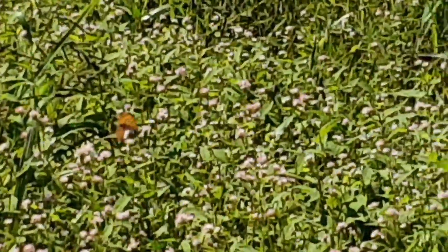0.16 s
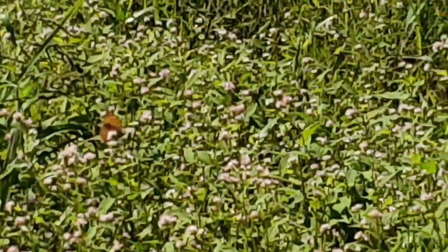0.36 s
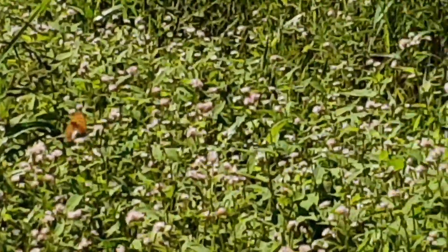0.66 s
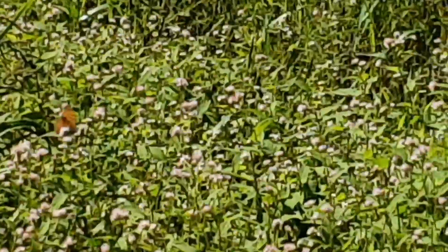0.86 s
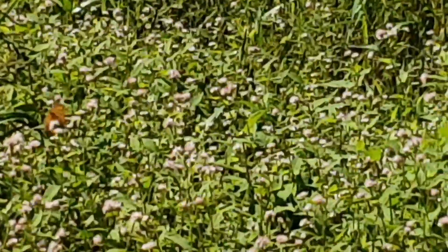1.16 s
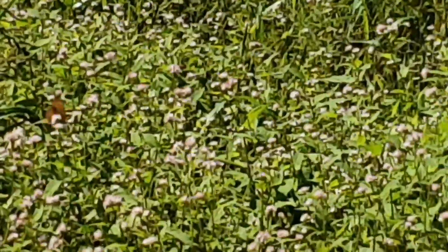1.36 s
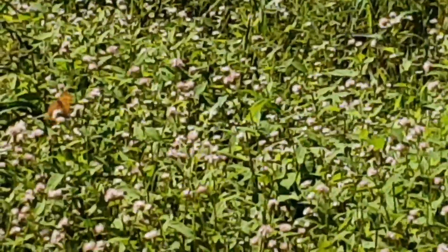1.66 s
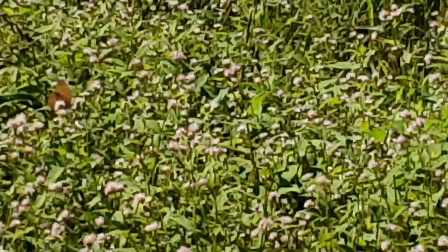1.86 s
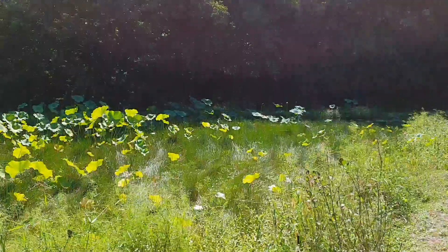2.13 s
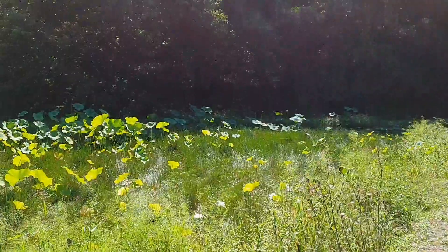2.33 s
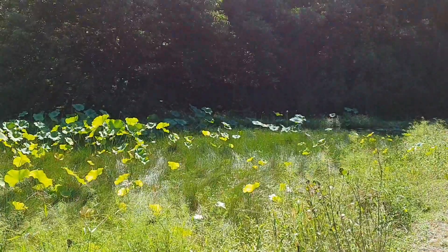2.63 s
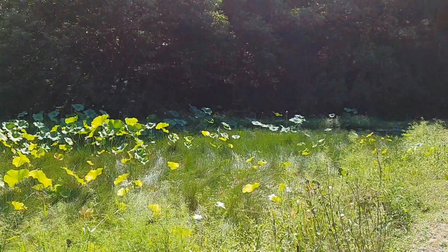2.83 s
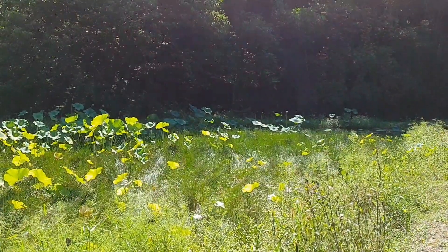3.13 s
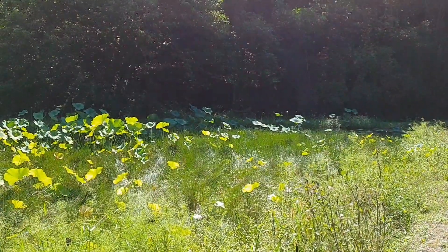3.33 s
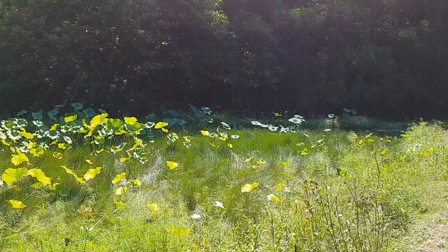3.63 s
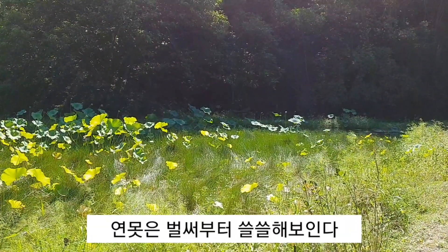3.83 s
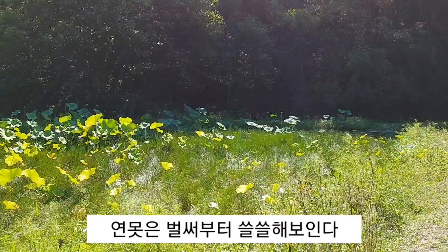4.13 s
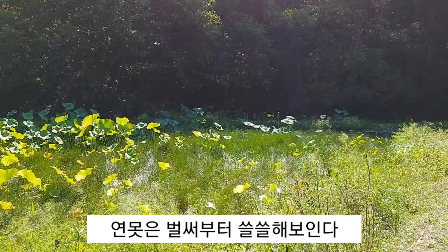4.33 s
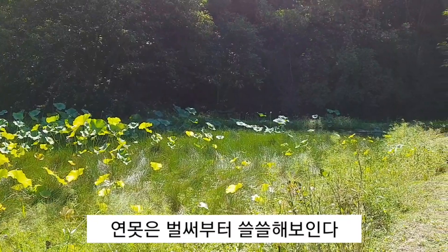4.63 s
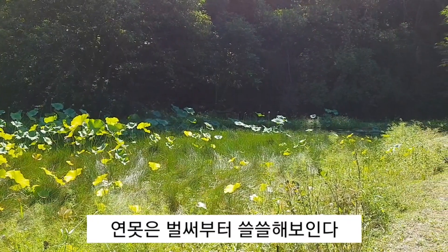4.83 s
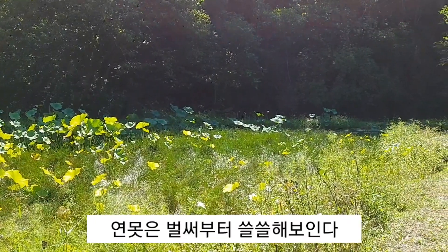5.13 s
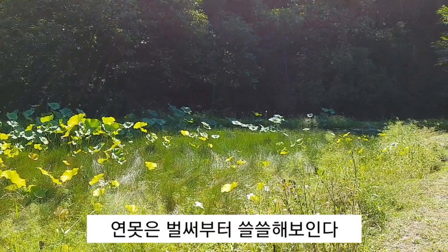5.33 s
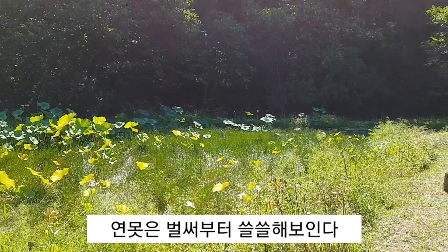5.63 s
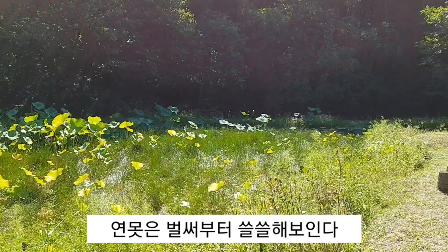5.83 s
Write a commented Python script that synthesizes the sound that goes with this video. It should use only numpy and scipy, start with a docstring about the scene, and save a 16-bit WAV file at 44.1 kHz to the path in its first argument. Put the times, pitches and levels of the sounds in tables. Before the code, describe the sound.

A nearby cicada, slightly left, gives bright buzzes and buzzy calls, then descends into rough short notes over the faint hiss of distant cicadas. A sudden change replaces it with a continuous, shimmering drone of many cicadas, leaning left. Very high, scraping katydid chirps keep going across both places, stronger in the second. Open-air stereo sound, with gentle wind rumble on the microphone and no people.

```python
"""Insects in a sunny meadow

A cicada alternates high buzzes (clicking ribs) with full calls (a ringing belly), then runs down in rough notes.
Katydids chirp throughout by striking the teeth of a ringing wing; a hiss of far-off cicadas surrounds them.
Then the meadow gives way to a pond: the hiss stops and many pulsing cicadas drone from the woods.
Shaped noise makes a light wind rumble on the microphone and the soft hiss of the landscape."""
import sys
import numpy as np
from scipy import signal
from scipy.fft import rfft, irfft
from scipy.io import wavfile

SR = 44100
rng = np.random.default_rng(int(sys.argv[2]) if len(sys.argv) > 2 else 0)


def waveform_to_disk(signal):
    """Save audio, clipped to [-1, 1], as 16-bit WAV at the path in sys.argv[1]."""
    frames = np.transpose(np.atleast_2d(signal))
    scaled = np.clip(frames, -1, 1) * 32767
    samples = np.round(scaled).astype(np.int16)
    wavfile.write(sys.argv[1], SR, samples)


N = 263718
T = np.arange(N) / SR  # time of every sample, in seconds
HZ = np.fft.rfftfreq(N, 1 / SR)  # frequencies of the spectrum
POND_S = 2.768  # the meadow gives way to the pond

# ribs that buckle in one cycle of the two tymbals, the cicada's drum skins: (share of the cycle, level [dB])
TYMBAL_RIBS = [(0, 0), (.26, -5), (.48, -1), (.73, -5)]
# high buzzes between the calls:
# (full from [s], until [s], relative level [dB], tymbal cycles at first [Hz], slowing [Hz per s])
BURSTS = [(0, .27, -40.5, 168, -1), (.56, .915, -41.5, 168.5, 4), (1.185, 1.52, -42, 168.5, 13.5)]
# colour of the high buzz: (frequency [Hz], level [dB])
BUZZ_COLOUR = [(7000, -24.5), (8000, -15), (9500, -45), (10800, -8), (11600, -1.5), (12100, -3.5),
               (13000, 4), (13600, 1), (14400, -1), (15400, -.5), (15800, -4.5)]
BURST_RISE_DB_PER_S, BURST_FALL_DB_PER_S = 278, 128

# full-voiced calls: (from [s], until [s], relative level [dB], basic tymbal cycles [Hz])
CALLS = [(.34, 0.476, -39.5, 172.0), (0.968, 1.104, -39.5, 171.7)]
# colour of the full voice: (frequency [Hz], level [dB])
VOICE_COLOUR = [(2700, -26), (3100, -18), (3430, -4), (3780, -1), (4120, 2), (4460, 0), (4810, -5),
                (5150, -15), (5500, -10), (5850, -14), (6200, -1), (6520, -2), (6900, -12), (8400, -20),
                (10000, -40)]
OPEN_S, TAIL_DB_PER_S = .026, 168  # how quickly the belly opens into full voice, and how fast it fades
BELLY_HZ, BELLY_WIDTH_HZ, BELLY_SINK_HZ_PER_S = 4900, 1200, 4500  # the belly resonance sinks through a call
SETTLE_S, FAST_START, SLOW_END = .0401, .016, .02  # the pulse rate starts high, settles and drops at the end
# the deepest resonance has the widest opening and the slowest fade
DEEP_HZ, DEEP_DB, DEEP_OPEN_S, DEEP_TAIL_DB_PER_S = 3620, -4, .043, 108
PICKUP_S, PICKUP_DB, PICKUP_HZ = .052, -8.5, 3480  # a low rasp comes just before each call
LEAD_S, LEAD_DB, LEAD_MULTIPLE = .082, -7, 29  # a thin whistle, at a multiple of the pulse rate, leads in

# rougher notes that close the song, each on two resonances:
# (start [s], end [s], relative level [dB], main resonance at the start [Hz], main resonance at the end [Hz],
#  second resonance at the start [Hz], second resonance level [dB], broad rasp level [dB])
NOTES = [(1.52, 1.563, -42.5, 3620, 3590, 3020, -5, 2), (1.56, 1.619, -41.5, 4940, 4905, 3620, -6.5, -2),
         (1.613, 1.695, -41.5, 5100, 5040, 4590, -2, -4), (1.698, 1.778, -45.5, 4600, 4300, 3900, -5, -7),
         (1.74, 1.782, -50, 3470, 3400, 3800, -4, -11), (1.79, 1.902, -46.5, 4470, 4336, 3830, -8, -8),
         (1.9, 2.15, -48, 4370, 4370, 3690, -2.5, -6), (2.146, 2.19, -47, 3870, 3875, 3560, -4, -4),
         (2.187, 2.288, -41.5, 5140, 5040, 4930, -3, -3), (2.282, 2.33, -43.5, 5060, 5040, 4420, -3, -2),
         (2.327, 2.423, -48, 4380, 4410, 3670, -5, -3), (2.423, 2.56, -49, 3990, 3980, 4730, -3, -8)]
# colour of the broad rasp: (frequency [Hz], level [dB])
NOTE_RASP = [(2200, -24), (3300, -2), (3900, 3), (4700, -5), (5600, -10), (6300, -3), (7500, -9),
             (9500, -29)]
NOTE_PULSE_HZ = 337.7  # approximate rate of both tymbals together
NOTE_RISE_DB_PER_S, NOTE_FALL_DB_PER_S = 1500, 350

# chirps of the nearest katydid, about four a second: (start [s], syllables before rounding, relative level [dB])
CHIRPS = [(.065, 4, -45), (.305, 4.5, -44), (.525, 3, -45), (.753, 5, -43), (.98, 4.7, -44), (1.24, 4, -42),
          (1.436, 5, -45), (1.672, 6.6, -42.5), (1.905, 6, -43), (2.121, 5.6, -44), (2.356, 5, -42.5),
          (2.591, 6.1, -43), (2.841, 6.8, -40.5), (3.066, 6, -39.5), (3.288, 5.7, -41), (3.512, 6.2, -41),
          (3.737, 7, -40.5), (3.976, 7, -41.5), (4.223, 6.1, -39.5), (4.454, 5.7, -40.5), (4.697, 6.1, -41),
          (4.928, 6.7, -41), (5.172, 5.2, -40), (5.405, 6, -42), (5.619, 7, -41.5), (5.863, 6.5, -41)]
# fainter katydids join in with runs of short, evenly spaced chirps:
# (first chirp [s], last chirp [s], relative level [dB], left minus right [dB])
RUNS = [(2.055, 2.674, -52, 3), (3.442, 4.066, -49, -10), (4.616, 5.71, -50, -9)]
RUN_PERIOD_S, RUN_SYLLABLES = .215, 4  # approximate spacing, and syllables in each chirp
MEADOW_SIDE_DB, POND_SIDE_DB = -2.5, 1.2  # nearest katydid, left minus right
# katydid wing resonance, before it wavers: (time [s], frequency [Hz])
WING_HZ = [(0, 13400), (1.7, 13700), (2.7, 13600), (2.85, 14000), (4.05, 13800), (4.3, 13350),
           (5.25, 13400), (5.65, 13600), (5.9, 13300)]
# rasp of the teeth around that resonance: (frequency [Hz], level [dB])
TEETH_RASP = [(6000, -33), (9000, -5), (11000, -2), (12500, 3.5), (14500, -8), (16000, -0.5)]

# overall colour of the chorus in the woods: (frequency [Hz], level [dB])
CHORUS_COLOUR = [(1800, -27), (2400, -23), (2750, -15), (3200, -11.5), (3600, -5.5), (4100, -4.5),
                 (4700, -2), (5200, -3.5), (5550, -7.5), (6150, -0.5), (6850, -7), (7600, -3.5),
                 (8300, -11), (9500, -14.5), (12500, -18.5)]
# belly resonances that stand out of the chorus: (frequency [Hz], width [Hz], boost [dB])
CHORUS_PEAKS = [(3670, 130, 4), (4100, 80, 0.5), (4650, 140, 1.5), (5940, 130, 3), (6190, 130, 3),
                (6700, 77, 6.5), (7020, 100, 7)]
# belly resonance of the nearest cicada in the chorus, before it wavers: (time [s], frequency [Hz])
LEADER_HZ = [(2.8, 4940), (3.6, 4790), (4.4, 4770), (5.1, 4680), (5.9, 4640)]
# colour of the far-off cicadas around the flowers: (frequency [Hz], level [dB])
FAR_CHORUS = [(1800, -23), (2500, -9), (3300, -2), (4400, 1), (5200, -2.5), (5800, -4.5), (6400, -4.5),
              (7200, -11), (8500, -17)]

# wind strength, before its lumps: (time [s], level [dB])
WIND_DB = [(0.0, -57), (.13, -57.5), (.2, -58.5), (1.75, -59), (1.85, -62.5), (1.95, -58), (2.7, -57.5),
           (2.85, -59), (3.98, -59.5), (4.13, -53.5), (4.26, -60.5), (4.8, -56), (4.96, -60.5), (5.98, -60)]
# colour of the wind among the flowers: (frequency [Hz], level [dB])
FLOWER_WIND = [(12, -39), (20, -17), (48, -1.5), (64, -3.5), (119, -3.5), (141, -7.5), (177, -9),
               (267, -8.5), (305, -13), (480, -22), (620, -50), (1060, -120)]
# colour of the wind by the pond: (frequency [Hz], level [dB])
POND_WIND = [(12, -42), (20, -12), (43, -4.5), (75, -2.5), (124, 0.5), (147, -0.5), (177, -10.5),
             (205, -4.5), (264, -5), (480, -20.5), (620, -70), (1060, -120)]
# colour of the far air and countless distant insects: (frequency [Hz], level [dB])
AIR_COLOUR = [(200, -21), (480, -6.5), (650, 1.5), (880, 3.5), (1150, -3), (1450, 1.5), (2200, 1),
              (3200, 4), (6500, 8), (8500, -8), (11000, 0), (13500, 0), (16000, -17)]
# how alike the two ears hear the wind and distance: (frequency [Hz], left-right likeness, 1 = the same)
ALIKE = [(30, 0.95), (80, 0.95), (160, 0.93), (280, 0.94), (450, 0.57), (750, 0.66), (1200, 0),
         (16000, 0.21)]


def near_cicada():
    """One cicada's song: high buzzes alternate with full calls, then the closing notes run down."""
    calls = sum(cicada_call(*call) for call in CALLS)
    calls = scatter(calls, t60=.4, wet_db=-5, lag=10)
    notes = sum(closing_note(*note) for note in NOTES)
    notes = scatter(notes, t60=.27, wet_db=-2, lag=10)
    return pan(1) * calls + pan(3.8) * notes + high_buzz()


def high_buzz(level_db=1, flutter_db=1.2, swell_db=.4, unsteady=.0007, hiss_db=-9):
    """Between calls the tymbal ribs click on with the belly shut: a bright buzz whose pulse rate drifts."""
    rate = np.full(N, 1. * BURSTS[0][3])
    loudness = np.zeros(N)
    for start, end, db, cycle_hz, slowing in BURSTS:
        early, late = outside(start, end)
        burst = amp(db + level_db - BURST_RISE_DB_PER_S * early - BURST_FALL_DB_PER_S * late)
        # the louder burst sets the pulse rate
        rate = np.where(burst > loudness, cycle_hz - slowing * np.clip(T - start, 0, .5), rate)
        loudness = np.maximum(loudness, burst)
    ribs = clicks(rate * (1 + unsteady * waver(20)), TYMBAL_RIBS, jitter=4e-6, drift=.004)
    ribs = ribs * amp(flutter_db * waver(300) + swell_db * waver(10.3))
    ribs = ribs + amp(hiss_db) * rng.standard_normal(N)
    buzz = loudness * colour(ribs, read(BUZZ_COLOUR, HZ))
    return pan(2.0) * scatter(buzz, t60=.093, wet_db=1.5, lag=18)


def cicada_call(start, end, db, cycle_hz, level_db=-2, uneven_db=-11, belly_db=-5.5, rasp_db=-12.0):
    """After a rasp and a whistle, two tymbals click in turn, unequally, and ring the sinking belly."""
    early, late = outside(start, end)
    settling = 1 / (1 + np.exp(np.clip((T - start) / SETTLE_S, -30, 30)))
    slowing = SLOW_END * np.minimum(late / SETTLE_S / 2, 1)
    rate = cycle_hz * (1 + FAST_START * settling ** 2 - slowing + .0011 * waver(24.9))
    one = clicks(rate)
    other = clicks(rate, [(.5, 0)])  # half a cycle later
    rasp = amp(rasp_db) * rng.standard_normal(N)

    voice = colour(unit(one + other) + rasp, read(VOICE_COLOUR, HZ))
    belly_hz = BELLY_HZ - BELLY_SINK_HZ_PER_S * np.clip(T - start, -.05, .25)
    belly = ring(one - amp(uneven_db) * other + rasp, belly_hz, BELLY_WIDTH_HZ)
    voice = voice + amp(belly_db) * belly
    opened = np.exp(-(early / OPEN_S) ** 2) * amp(-TAIL_DB_PER_S * late)

    deep_opened = np.exp(-(early / DEEP_OPEN_S) ** 2) * amp(DEEP_DB - DEEP_TAIL_DB_PER_S * late)
    deep = deep_opened * ring(one + other, DEEP_HZ, 560)

    whistle_turns = LEAD_MULTIPLE * np.cumsum(rate) / SR
    whistle = unit(np.sin(2 * np.pi * whistle_turns + .8 * waver(150))) * amp(LEAD_DB + 2 * waver(120))
    whistle = whistle * np.exp(-((T - start + LEAD_S / 4) / LEAD_S) ** 2)

    pickup = amp(PICKUP_DB) * ring(rng.standard_normal(N), PICKUP_HZ, 1600)
    pickup = pickup * np.exp(-((T - start + PICKUP_S) / PICKUP_S) ** 2)
    return amp(db + level_db) * (opened * voice + deep + whistle + pickup)


def closing_note(start, end, db, from_hz, to_hz, second_hz, second_db, rasp_db,
                 level_db=-1.7, width_hz=440, unsteady=.006, hiss_db=-9, flicker_db=1.7):
    """Unsteady clicks ring two resonances over a rough rasp; pulse rates and resonances glide together."""
    glide = np.interp(T, [start, end], [1, to_hz / from_hz]) * (1 + unsteady * waver(45))
    # a whole number of ringing cycles fits between clicks
    main, second = [clicks(hz / round(hz / NOTE_PULSE_HZ) * glide, jitter=1.2e-5)
                    for hz in (from_hz, second_hz)]
    hiss = amp(hiss_db) * rng.standard_normal(N)
    voice = ring(main + hiss, from_hz * glide, width_hz)
    voice = voice + amp(second_db) * ring(second + hiss, second_hz * glide, width_hz)
    ribs = clicks(NOTE_PULSE_HZ / 2 * glide, TYMBAL_RIBS, jitter=8e-5)
    voice = voice + amp(rasp_db) * colour(ribs, read(NOTE_RASP, HZ))
    early, late = outside(start, end)
    fade_db = -NOTE_RISE_DB_PER_S * early - NOTE_FALL_DB_PER_S * late
    return amp(db + level_db + flicker_db * waver(25) + fade_db) * unit(voice)


def katydids(level_db=2, syllable_s=.0192, rise_s=.0045, fall_s=.0036, first_db=-3, grow_db=.06,
             width_hz=1900, rasp_db=-2):
    """Each syllable is one closing of the wings: a swelling run of tooth strikes. Chirps start softly."""
    strokes = np.zeros((2, N))
    for first, syllables, db, side_db in chirps():
        for k in range(round(syllables)):
            s = first + k * syllable_s
            near = slice(max(round(s * SR) - 900, 0), round(s * SR) + 900)
            t = T[near] - s
            swell = np.exp(-.5 * (t / np.where(t < 0, rise_s, fall_s)) ** 2)
            stroke_db = db + level_db + first_db * (k == 0) + grow_db * (k - syllables / 2)
            stroke_db = stroke_db + .6 * rng.standard_normal()  # strokes vary in strength
            strokes[:, near] += pan(side_db) * amp(stroke_db) * swell
    # the grass makes the two ears mostly unlike
    teeth = np.array([tooth_run(), tooth_run()]) + .5 * tooth_run()
    wing_hz = follow(WING_HZ)[0] * (1 + .012 * waver(5.7))
    wings = ring(teeth, wing_hz, width_hz) + amp(rasp_db) * colour(teeth, read(TEETH_RASP, HZ))
    return scatter(strokes * unit(wings), t60=.11, wet_db=-1.5)


def chirps():
    """Lists every katydid chirp as (start [s], syllables, relative level [dB], left minus right [dB])."""
    found = [(s, syllables, db, MEADOW_SIDE_DB if s < POND_S else POND_SIDE_DB)
             for s, syllables, db in CHIRPS]
    for first, last, db, side_db in RUNS:
        count = 1 + round((last - first) / RUN_PERIOD_S)
        found += [(s, RUN_SYLLABLES, db, side_db) for s in np.linspace(first, last, count)]
    return found


def tooth_run(tooth_hz=1900):
    """A scraper jumps unevenly from tooth to tooth, clicking at each."""
    return clicks(tooth_hz * (1 + .12 * waver(90)), jitter=5e-5) * amp(2 * waver(700))


def chorus(level_db=-42.5, leader_db=-7, leader_hz=288.3, leader_width_hz=700, unsteady=.009, count=12):
    """Many cicadas in the woods, each with its own echoes and wavering pulses; the nearest's note sinks."""
    crowd = sum(scatter(clicks(hz * (1 + .04 * waver(7))), t60=.3, wet_db=7, lag=2)
                for hz in np.geomspace(230, 460, count))
    peaks_db = sum(db / (1 + (2 * (HZ - hz) / width) ** 2) for hz, width, db in CHORUS_PEAKS)
    drone = colour(crowd, read(CHORUS_COLOUR, HZ) + peaks_db)

    pulses = clicks(leader_hz * (1 + unsteady * waver(22)), jitter=1.5e-5)
    belly_hz = follow(LEADER_HZ)[0] * (1 + .017 * waver(4))
    leader = scatter(ring(pulses, belly_hz, leader_width_hz), t60=.2, wet_db=1, lag=2)
    drone = drone + amp(leader_db + 2 * waver(14)) * leader
    drone = unit(shimmer(drone, depth_db=1.54, drift_hz=5))
    return pan(5.2) * amp(level_db + .3 * waver(1.95)) * (T > POND_S) * drone


def far_chorus(level_db=-49):
    """Cicadas so far off that their pulses merge into a wavering hiss from all sides, made of noise."""
    hiss = colour(rng.standard_normal((2, N)), read(FAR_CHORUS, HZ))
    return pan(2.4) * amp(level_db + .5 * waver(5.53)) * (T < POND_S) * hiss


def wind(lumps_db=1.5):
    """Low noise makes a lumpy rumble, coloured differently among the flowers and by the pond."""
    air = wide_noise()
    flowers = colour(air, read(FLOWER_WIND, HZ))
    pond = colour(air, read(POND_WIND, HZ))
    rumble = np.where(T < POND_S, flowers, pond)
    return pan(2.5) * amp(follow(WIND_DB)[0] + lumps_db * waver(7)) * rumble


def distance(level_db=-50, pond_db=1):
    """Gently swelling noise is the soft hiss of the whole landscape, a little louder by the pond."""
    hiss = colour(wide_noise(), read(AIR_COLOUR, HZ))
    return pan(3.6) * amp(level_db + pond_db * (T > POND_S) + .5 * waver(3)) * hiss


def wide_noise():
    """Noise that is alike in both ears in the bass and mostly unrelated in the treble."""
    left, other = rfft(rng.standard_normal((2, N)))
    same = np.clip(read(ALIKE, HZ), -1, 1)
    right = same * left + np.sqrt(1 - same ** 2) * other
    return irfft(np.array([left, right]), N)


def clicks(rate, strikes=((0, 0),), jitter=0, drift=0):
    """Sharp clicks at each strike of a cycle; jitter [s] shakes the timing, drift slides the strikes."""
    turns = np.cumsum(rate) / SR + jitter * rate * waver(300)
    out = np.zeros(N)
    for share, db in strikes:
        place = share + drift * waver(5) if drift else share
        away = ((turns - place + .5) % 1 - .5) * SR / rate  # samples from the nearest strike
        near = abs(away) < 10
        out[near] += amp(db) * np.sinc(away[near]) * np.exp(-away[near] ** 2 / 20)
    return unit(out)


def ring(x, hz, width):
    """A steep moving resonance: the sound is shifted down to 0 Hz, smoothed and shifted back; rms 1."""
    turn = np.exp(2j * np.pi * np.cumsum(hz * np.ones(N)) / SR)
    r = np.exp(-np.pi * width / SR)
    smoothed = signal.lfilter([1], [1, -2 * r, r * r], x / turn + 1e-18)
    return unit((turn * smoothed).real)


def scatter(x, t60, wet_db, lag=0):
    """The direct sound, lag samples later on the right, plus a dying spray of echoes off leaves."""
    t = np.arange(SR // 2) / SR
    tail = rng.standard_normal((2, len(t))) * amp(-60 * t / t60)
    tail /= np.linalg.norm(tail, axis=1, keepdims=True)
    x = x * np.ones((2, 1))
    wet = signal.fftconvolve(x, tail, axes=1)[:, :N]
    direct = np.array([x[0], np.roll(x[1], round(lag))])
    return (direct + amp(wet_db) * wet) / np.hypot(1, amp(wet_db))


def shimmer(x, depth_db, count=21, drift_hz=3):
    """Moving air makes each narrow band of a far sound swell and fade on its own."""
    hz, s, z = signal.stft(x, SR, nperseg=1024)
    bands = np.linspace(3000, 8000, count)
    swells = np.array([np.interp(s, T, waver(drift_hz)) for band in bands])
    db = np.transpose([np.interp(hz, bands, frame) for frame in swells.T])
    return signal.istft(z * amp(depth_db * db), SR, nperseg=1024)[1][..., :N]


def colour(x, db):
    """Filters by a gain for every frequency; rms 1."""
    return unit(irfft(rfft(x) * amp(db), N))


def waver(hz):
    """Slow chance of rms 1, up to about hz."""
    knots = np.arange(0, T[-1] + 1, .5 / hz)
    return unit(np.interp(T, knots, rng.standard_normal(len(knots))))


def outside(start, end):
    """Seconds still to go before start, and seconds gone since end."""
    return np.maximum(start - T, 0), np.maximum(T - end, 0)


def follow(rows):
    """Every column of a curve table, sample by sample."""
    s, *columns = np.transpose(rows)
    return [np.interp(T, s, c) for c in columns]


def read(points, hz):
    """A spectrum joined by straight lines over log frequency."""
    f, value = np.transpose(points)
    return np.interp(np.log(hz + 1), np.log(f + 1), value)


def pan(db):
    """Left and right gains for a level difference, left minus right."""
    return amp([[db / 2], [-db / 2]])


def amp(db):
    """Decibels to gain."""
    return 10 ** (np.asarray(db) / 20)


def unit(x):
    """Scales to rms 1, a standard average strength."""
    return x / np.sqrt(np.mean(x ** 2) + 1e-20)


def scene():
    """All the insects, the wind and the distance."""
    return near_cicada() + katydids() + chorus() + far_chorus() + wind() + distance()


def record(dry):
    """The recorder's steep band limit removes the highest treble."""
    band_limit = signal.firwin(511, 15850, window=("kaiser", 9), fs=SR)  # cutoff in Hz
    return signal.oaconvolve(dry, band_limit[None], "same")


dry = scene()
out = record(dry)
waveform_to_disk(out)
```